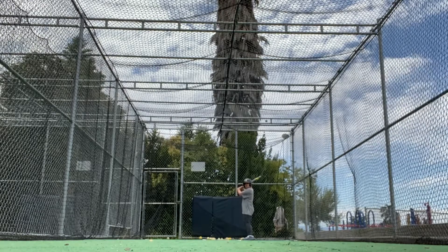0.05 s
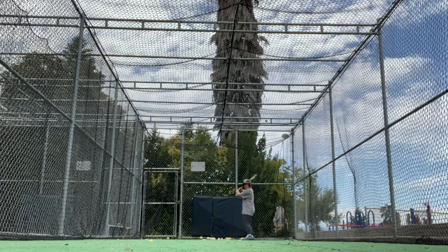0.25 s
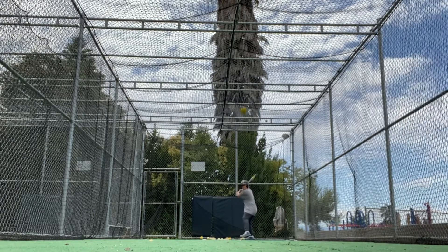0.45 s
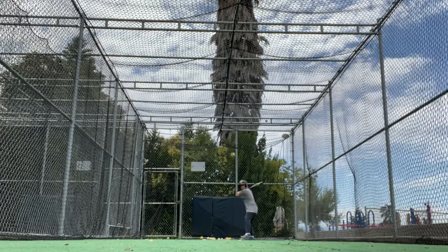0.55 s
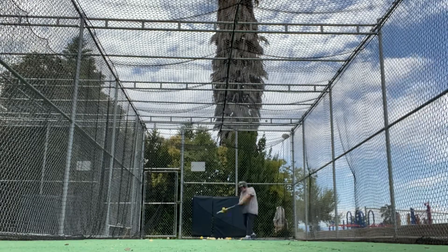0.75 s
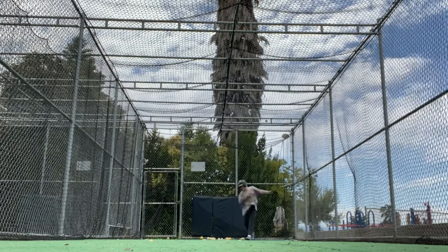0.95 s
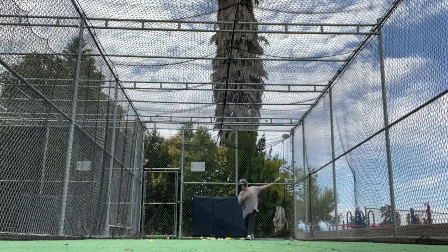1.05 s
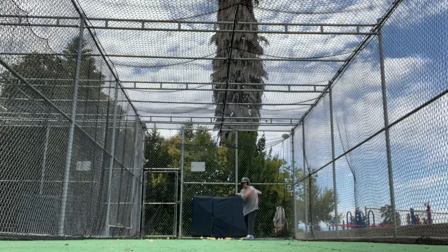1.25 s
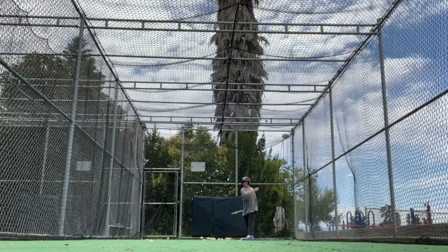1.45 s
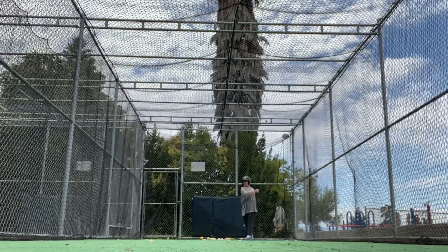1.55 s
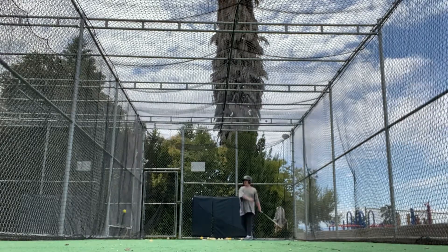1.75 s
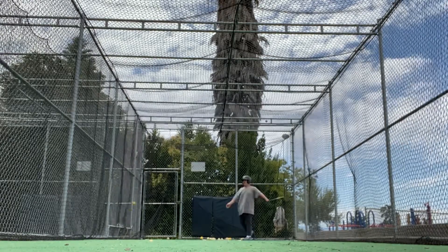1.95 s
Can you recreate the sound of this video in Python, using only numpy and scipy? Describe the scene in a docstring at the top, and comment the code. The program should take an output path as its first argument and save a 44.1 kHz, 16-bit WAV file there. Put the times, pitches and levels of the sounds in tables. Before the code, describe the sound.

One sharp bat hit rings briefly through an outdoor cage. Before it, a pitching machine close to the microphone clanks; after it come a soft zip of netting and a dull bounce. A thin whine and light wind continue underneath.

```python
"""A pitching machine whines close by; its spinning wheel grabs a ball with a scuff and a clank of the frame.
Farther off in the outdoor batting cage the bat cracks: the squashed ball radiates a pressure pulse and
the bat rings in its damped modes. The ball rustles into the netting and later bounces on the court.
The yard reverberates and a distant wall echoes the launch and the hit. The whine goes on throughout,
over distant traffic and light wind."""
import sys
import numpy as np
from scipy import signal
from scipy.fft import rfft, irfft, next_fast_len
from scipy.io import wavfile
from scipy.ndimage import map_coordinates

SR = 44100
rng = np.random.default_rng(int(sys.argv[2]) if len(sys.argv) > 2 else 0)


def wav_record(signal):
    """Record a signal, one row per channel, as 16-bit PCM in the file named by sys.argv[1]."""
    frames = np.transpose(np.atleast_2d(signal))
    bounded = np.clip(frames, -1, 1)
    # unit amplitude maps onto the largest positive 16-bit level
    quanta = np.round(bounded * 32767).astype(np.int16)
    wavfile.write(sys.argv[1], SR, quanta)


N = 88200
TIME = np.arange(N) / SR
LAUNCH_S, HIT_S, NET_S, BOUNCE_S = .229, .8058, 1.024, 1.8438


def launch():
    """Friction and reaction: the wheel grips and throws the ball; the frame rings, rattles and recoils."""
    # ball entering the wheel: f/Hz, level/dB
    brush_spectrum = [(200, -10), (1000, 5.5), (2000, -17), (4000, -24), (9000, -15), (15000, -36)]
    # ball rubbing on rubber: f/Hz, level/dB
    scuff_spectrum = [(500, -35), (3500, -24), (6500, 2.5), (9000, 4), (10500, -20), (13000, -20),
                      (15500, -7.5)]
    # modes of the frame: f/Hz, level/dB, t60/s
    frame_modes = [(761, -11, .15), (851, -4, .15), (943, 0, .15), (1029, -1, .16), (1170, -5, .17),
                   (1232, -8, .15), (1370, 0, .16), (1460, -8, .17), (1541, -2, .16), (1630, -7, .16),
                   (1798, -11, .16), (2662, -15, .17), (4883, -14, .11), (8380, -27, .09)]
    # hollow knock of the housing: f/Hz, level/dB
    housing_spectrum = [(30, -27), (70, -9), (200, -7), (320, 0), (440, -4.5), (600, -7), (900, -3.5),
                        (1500, -11), (4000, -55)]
    # loose parts: f/Hz, level/dB
    clatter_spectrum = [(100, -19), (400, -10), (950, 0), (1550, -2.5), (2000, -8), (2700, -14),
                        (3600, -33), (8000, -52)]
    # small metal parts: f/Hz, level/dB
    rattle_spectrum = [(1500, -17), (3000, -2.5), (4000, 3), (4800, 11), (5600, -1), (6700, -0.5),
                       (7800, -12.5), (8800, 2.5), (10500, -17), (13000, -28), (15300, -23), (16500, -35)]
    brush = amp(-13) * noise(brush_spectrum) * envelope(.2205, rise=.0033, hold=.00088, t60=.034)
    scuff = amp(-19) * noise(scuff_spectrum) * envelope(.2228, rise=.00023, hold=.0028, t60=.0065)
    kick = amp(-4.5) * pop(LAUNCH_S - .003, start_hz=1199, end_hz=903, fall_s=.0041, rise=.00054, t60=.054)
    frame = amp(-16) * ring(frame_modes, LAUNCH_S, rise=.0061, hold=.015, blur=.2, spread=.3)
    knock = amp(-17) * noise(housing_spectrum) * envelope(.2237, rise=.005, hold=.018, t60=.11)
    clatter = amp(-17.5) * noise(clatter_spectrum) * envelope(.225, rise=.0067, hold=.027, t60=.2)
    rattle = amp(-25.5) * noise(rattle_spectrum) * envelope(.2264, rise=.012, hold=.026, t60=.1)
    recoil_s, recoil_hz = .233, 140
    sway = np.sin(2 * np.pi * recoil_hz * (TIME - recoil_s))
    recoil = amp(-14.5) * sway * envelope(recoil_s, rise=.0071, hold=.01, t60=.09)
    clank = brush + scuff + kick + frame + clatter + rattle
    return pan(clank, left_db=-1.5) + pan(recoil + knock, left_db=1)


def bat_hit():
    """Impact excitation: the swung bat squashes the ball and rings in its modes; the cage answers."""
    # air flowing round the bat: f/Hz, level/dB
    swish_spectrum = [(200, -12), (700, -1), (1400, 1), (3000, -9), (8000, -38)]
    # first contact: f/Hz, level/dB
    snap_spectrum = [(400, -27), (1500, -8.5), (2300, 0.5), (4000, -1.5), (6000, -14.5), (10000, -5.5),
                     (13000, -31), (15500, -12)]
    # crack of the collision: f/Hz, level/dB
    crack_spectrum = [(120, -29), (300, -9), (600, 8.5), (1300, -6), (2200, -9), (2900, -17), (3500, -1),
                      (4200, -9), (5600, -22.5), (9500, -23.5), (11500, -24), (13000, -48), (15000, -21),
                      (16500, -40)]
    # modes of the bat: f/Hz, level/dB, t60/s
    bat_modes = [(317, -14, 0.054), (503.4, -20, 0.036), (589.2, -18, 0.1), (1285, -20, 0.056),
                 (1835, -32, 0.078), (3666, -15, 0.042), (4760, -30.5, 0.044), (8040, -27, 0.036)]
    # modes of the cage: f/Hz, level/dB, t60/s
    cage_modes = [(611, -26, .22), (3390, -33, 0.14), (3450, -35, 0.07)]
    swish = amp(-39) * noise(swish_spectrum) * envelope(.8, rise=.041, hold=0, t60=.12)
    snap = amp(-17) * noise(snap_spectrum) * envelope(HIT_S + .00024, rise=.0002, hold=.00044, t60=.013)
    ball = amp(1) * pop(HIT_S, start_hz=1800, end_hz=400, fall_s=.0013, rise=.0005, t60=.019)
    crack = amp(-20) * noise(crack_spectrum) * envelope(HIT_S + .0016, rise=.00046, hold=.0033, t60=.11)
    ping = ring(bat_modes, HIT_S + .001, rise=.0005, hold=0, blur=.2, spread=.3)
    cage = ring(cage_modes, HIT_S + .018, rise=.01, hold=.004, blur=.5, spread=.45)
    return swish + snap + ball + crack + ping + cage


def netting():
    """Sliding friction: the zip falls in pitch as the ball slows; the net shakes, later the fence chinks."""
    # shakes of the net: t/s, level/dB, rise/s, t60/s
    net_shakes = [(1.024, -39, 0.016, 0.23), (1.081, -44.5, 0.027, 0.16)]
    # rustling mesh: f/Hz, level/dB
    net_spectrum = [(200, -32), (700, 3.5), (1400, 7.5), (2400, -1.5), (3300, -9.5), (6000, -18.5),
                    (10000, -16.5), (15000, -29)]
    # faint chink of the fence: t/s, level/dB, rise/s, t60/s
    fence_chinks = [(1.745, -52, 0.13, 0.16)]
    # chinking fence: f/Hz, level/dB
    fence_spectrum = [(500, -26), (2200, -14), (2650, 0), (3300, -11), (4500, -40), (15000, -45)]
    start_hz, slowing_s = 2380, .16
    hz = start_hz * np.exp(-np.clip(TIME - NET_S, 0, .1) / slowing_s)
    phase = 2 * np.pi * np.cumsum(hz) / SR + 1.3 * wobble(550)
    slide = np.sin(phase + .6 * np.array([wobble(300), wobble(300)]))
    zipping = amp(-42.5) * slide * envelope(NET_S, rise=.0089, hold=.018, t60=.56) * amp(3.6 * wobble(130))
    rustle = bursts(net_shakes) * noise(net_spectrum)
    chink = bursts(fence_chinks) * noise(fence_spectrum)
    return zipping + (rustle + chink) * amp(1.5 * wobble(230))


def bounce():
    """Impact on a hard surface: the ball ticks on the court and compresses with a dull knock."""
    # contact tick: f/Hz, level/dB
    tick_spectrum = [(300, -12), (900, 2), (2300, 2), (3300, -13), (6000, -31), (14000, -44)]
    # thud of the landing: f/Hz, level/dB
    thud_spectrum = [(100, -4), (300, 5.5), (550, -2.5), (900, -31), (2300, -20), (3500, -27), (12000, -61)]
    tick = amp(-36) * noise(tick_spectrum) * envelope(BOUNCE_S, rise=.00028, hold=.00085, t60=.01)
    knock = amp(-8.5) * pop(BOUNCE_S + .00077, start_hz=620, end_hz=268, fall_s=.003, rise=.0034, t60=.02)
    thud = amp(-33.5) * noise(thud_spectrum) * envelope(BOUNCE_S, rise=.00042, hold=.002, t60=.21)
    return tick + knock + thud


def motor_whine():
    """Periodic motion radiates tones: the idling wheel and motor give thin, slightly unsteady ones."""
    # partials of the whine: f/Hz, level/dB
    hum_partials = [(479, -63), (598, -63), (720, -63), (958, -58), (1319, -66), (2998, -77)]
    # the motor's treble whistle: f/Hz, level/dB
    whistle_partials = [(4420, -6), (4780, 1), (4963, -8.5), (8963, -29)]
    # gain of that whistle: t/s, level/dB
    whistle_levels = [(0, -72.5), (.5, -73), (1.25, -71.5), (1.5, -66.5), (1.7, -65.5), (2, -66.5)]
    # swells of one singing tone: t/s, level/dB
    sing_levels = [(0, -72), (.18, -71), (.4, -61), (.55, -61), (.7, -64), (1.15, -66), (1.35, -66),
                   (1.48, -57), (1.64, -58), (1.76, -64), (2, -63)]

    def tone(hz):
        phase = 2 * np.pi * hz * np.cumsum(1 + .00146 * wobble(9.4)) / SR
        return np.sqrt(2) * np.sin(phase + .15 * np.array([wobble(40.1), wobble(40.25)]))
    hum = sum(amp(db + 2 * wobble(6)) * tone(hz) for hz, db in hum_partials)
    whistle = level(whistle_levels) * sum(amp(db) * tone(hz) for hz, db in whistle_partials)
    return hum + whistle + level(sing_levels) * tone(hz=1930.6)


def yard(x):
    """Reverberation: diffuse reflections die away exponentially, each frequency at its own rate."""
    # reverberation time of the surroundings: f/Hz, t60/s
    decay_times = [(150, 0.16), (600, 0.38), (2200, 0.37), (3700, 0.19), (6000, 0.37), (14000, 0.24)]
    hz, t, bands = signal.stft(rng.standard_normal((2, SR // 2)), SR, nperseg=256)
    tail = signal.istft(bands * amp(-60 * t / along(decay_times, hz)[:, None]), SR, nperseg=256)[1]
    return convolve(x, tail)


def wall_echo(x, delay_s=.0936):
    """Delayed reflection: a distant wall returns a scattered slap."""
    # colour of the reflection: f/Hz, level/dB
    wall_spectrum = [(150, -21), (650, 8), (1200, -12), (2200, 7), (3350, 5), (3750, -10), (8000, -9),
                     (15000, -5.5)]
    scatter = noise(wall_spectrum) * envelope(delay_s, rise=.015, hold=.0056, t60=.29)
    return convolve(x, scatter[:, :SR // 2])


def outdoors():
    """Incoherent sources sum to broadband noise: a wash of machine and traffic over a swelling rumble."""
    # machine and distant traffic: f/Hz, level/dB
    wash_spectrum = [(40, -4), (130, 0), (250, -1), (450, -7), (700, -6), (1000, -5), (1400, -11),
                     (2200, -21.5), (3000, -20.5), (3800, -25), (4800, -17.5), (5600, -29), (7200, -35.5),
                     (8800, -26), (10200, -34.5), (12500, -59.5), (15500, -40)]
    # drift of the wash: t/s, level/dB
    wash_levels = [(0, -48.5), (.19, -51), (.38, -47), (.76, -48), (1.2, -50), (1.6, -49.5), (2, -48)]
    # low rumble: f/Hz, level/dB
    rumble_spectrum = [(15, -22), (35, -16.5), (60, 2), (110, -5.5), (180, -11.5), (350, -28), (900, -62.5)]
    # swells of the rumble: t/s, level/dB
    rumble_levels = [(0, -42.5), (.18, -48.5), (.3, -38), (.43, -49), (.52, -33.5), (.6, -35), (.65, -43.5),
                     (.695, -33), (.74, -61), (1.1, -47), (1.14, -41.5), (1.26, -49), (1.4, -42),
                     (1.5, -38), (1.55, -56), (1.66, -55.5), (1.725, -33.5), (1.82, -55.5), (2, -33.5)]
    waver = amp(.7 * wobble(12))
    wash = amp(3.5) * level(wash_levels) * noise(wash_spectrum) * waver
    return wash + level(rumble_levels) * noise(rumble_spectrum)


def ring(modes, s, rise, hold, blur, spread):
    """Modal superposition: damped sines; blur unsteadies their phase, spread parts it between channels."""
    out, size, start = np.zeros((2, N)), SR // 2, max(int(s * SR) - SR // 20, 0)
    for hz, db, t60 in modes:
        phase = 2 * np.pi * (hz * TIME[:size] + rng.random()) + blur * wobble(94.5, size)
        apart = min(spread * np.sqrt(hz / 1000), 1) * rng.choice([-1, 1]) * np.array([[1], [-1]])
        decay = envelope(s - start / SR, rise, hold, t60, size)
        out[:, start:start + size] += amp(db) * decay * np.sin(phase + apart)
    return out


def pop(s, start_hz, end_hz, fall_s, rise, t60):
    """Transient radiation: a squashed ball gives a pressure pulse of falling pitch, with no deep bass."""
    t = np.clip(TIME - s, 0, .2)
    cycles = end_hz * t + (start_hz - end_hz) * fall_s * (1 - np.exp(-t / fall_s))
    pulse = np.sin(2 * np.pi * cycles) * (1 - np.exp(-t / rise)) * np.exp(-np.log(1000) * t / t60)
    return signal.sosfilt(signal.butter(2, end_hz / 2, "high", fs=SR, output="sos"), pulse)


def noise(spectrum):
    """Partial coherence: mid and side noise mix to stereo of rms 1; the spectrum sets only its colour."""
    # likeness of left and right: f/Hz, correlation
    coherence = [(50, 0.3), (250, 0.63), (1000, 0.16), (2500, 0.029), (5000, -0.6), (8000, 0.3),
                 (13000, 0.41)]

    def response(hz):
        angle = np.arccos(np.clip(along(coherence, hz), -1, 1)) / 2
        return amp(along(spectrum, hz)) * [np.cos(angle), np.sin(angle)]
    mid, side = filtered(rng.standard_normal((2, N)), response)
    stereo = np.array([mid + side, mid - side])
    return stereo / np.sqrt(np.mean(stereo ** 2) + 1e-20)


def envelope(s, rise, hold, t60, size=N):
    """Exponential growth and decay: up 20 dB per rise until s, a hold, down 60 dB per t60 (seconds)."""
    t = TIME[:size] - s
    fall = np.log(10) * np.maximum(-t, 0) / rise + np.log(1000) * np.maximum(t - hold, 0) / t60
    return np.exp(-np.minimum(fall, 20))


def bursts(rows):
    """Superposed envelopes, one for each row."""
    return sum(amp(db) * envelope(s, rise, 0, t60) for s, db, rise, t60 in rows)


def wobble(rate, size=N):
    """Random modulation: a smooth curve with rate knots a second."""
    coarse = TIME[:size:16]
    curve = map_coordinates(rng.standard_normal(1024), [coarse * rate], mode="mirror")
    return np.interp(TIME[:size], coarse, curve)


def amp(db):
    """Amplitude ratio of a level in decibels."""
    return 10 ** (np.asarray(db) / 20)


def level(rows):
    """Gain per sample, interpolated between rows of t/s, level/dB."""
    return amp(np.interp(TIME, *np.transpose(rows)))


def along(points, hz):
    """Interpolation on a logarithmic frequency axis."""
    f, values = np.transpose(points)
    return np.interp(np.log(hz + 1), np.log(f + 1), values)


def filtered(x, response):
    """Linear filtering: the spectrum of x times a frequency response."""
    size = next_fast_len(N + SR // 2)
    return irfft(rfft(x, size) * response(np.fft.rfftfreq(size, 1 / SR)), size)[..., :N]


def convolve(x, impulse):
    """Convolution with an impulse response, scaled to unit energy on the left."""
    return signal.fftconvolve(x, impulse / np.linalg.norm(impulse[0]), axes=1)[:, :N]


def pan(x, left_db):
    """Interchannel level difference: positive values lean the sound to the left."""
    return x * amp(np.array([[left_db], [-left_db]]) / 2)


def scene():
    """Superposition: near machine, farther bat, their reflections, the ball and the background."""
    machine, bat = launch(), bat_hit()
    reverberation = amp(-19.5) * yard(machine) + amp(-12) * yard(bat)
    echo = amp(-30.5) * wall_echo(bat + amp(-2.5) * machine)
    return machine + bat + reverberation + echo + netting() + bounce() + motor_whine() + outdoors()


def record(dry):
    """Soft saturation rounds peaks near full scale; a steep low-pass limits the band."""
    ceiling, top_hz = .95, 16000
    rounded = dry / (1 + np.abs(dry / ceiling) ** 6) ** (1 / 6)
    return filtered(rounded, lambda hz: 1 / (1 + (hz / top_hz) ** 120))


dry = scene()
out = record(dry)
wav_record(out)
```